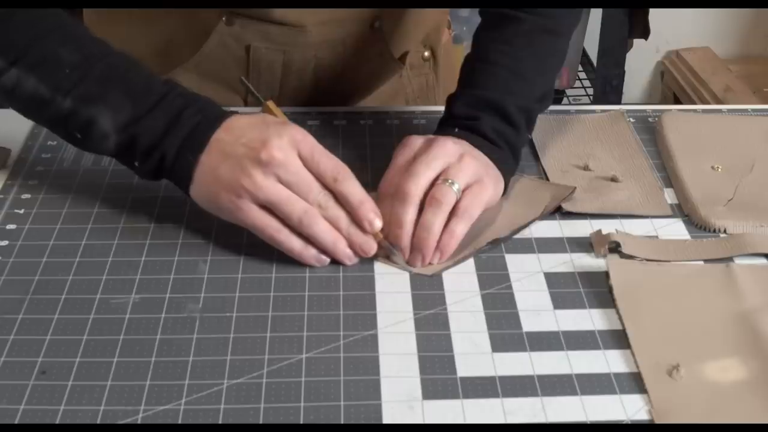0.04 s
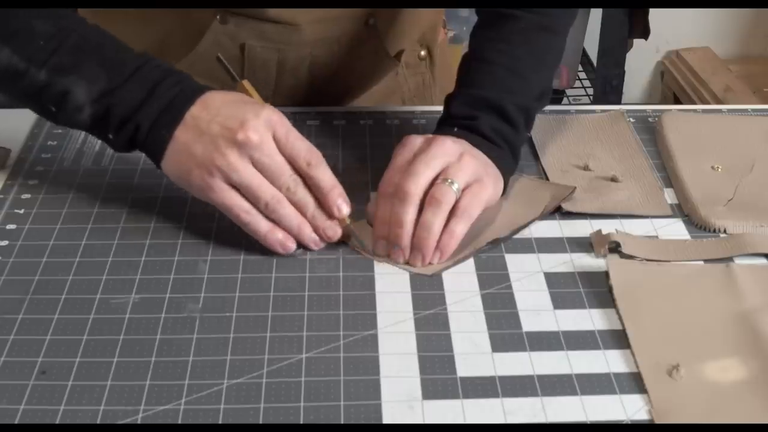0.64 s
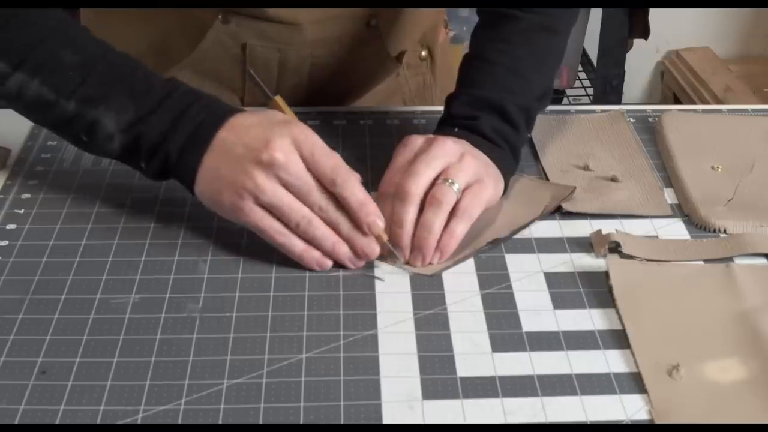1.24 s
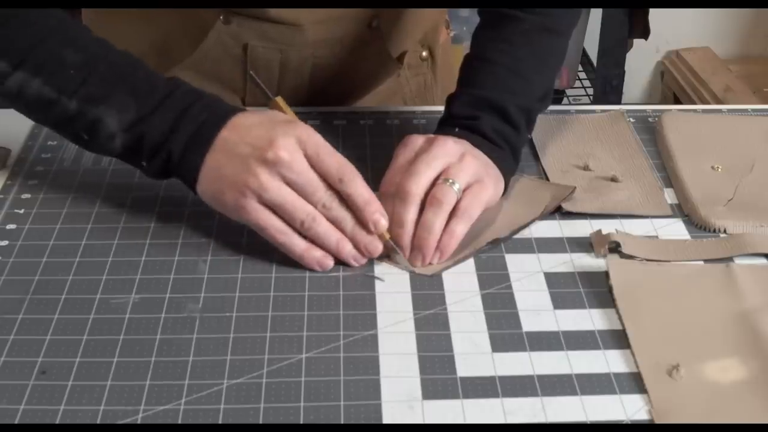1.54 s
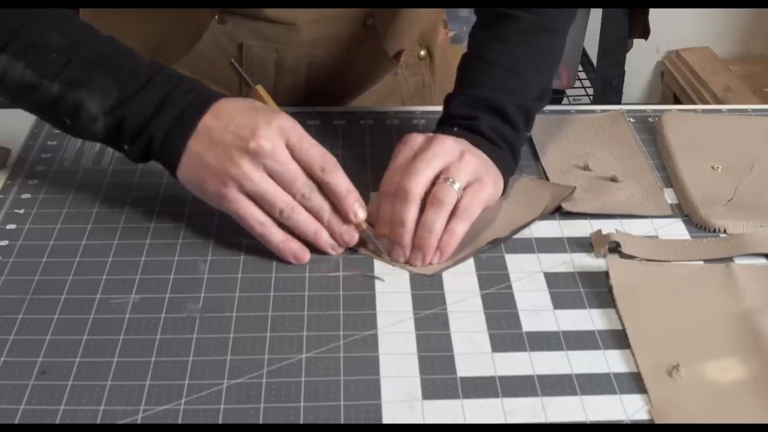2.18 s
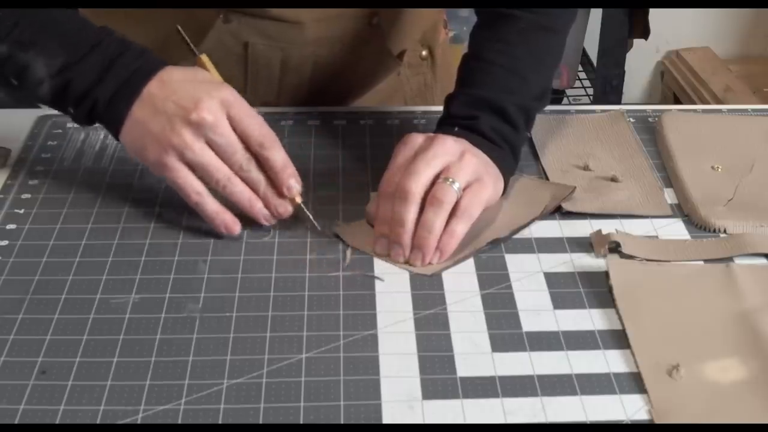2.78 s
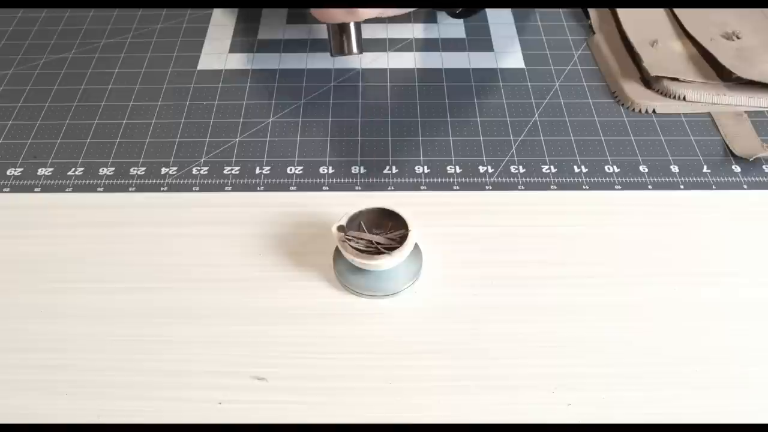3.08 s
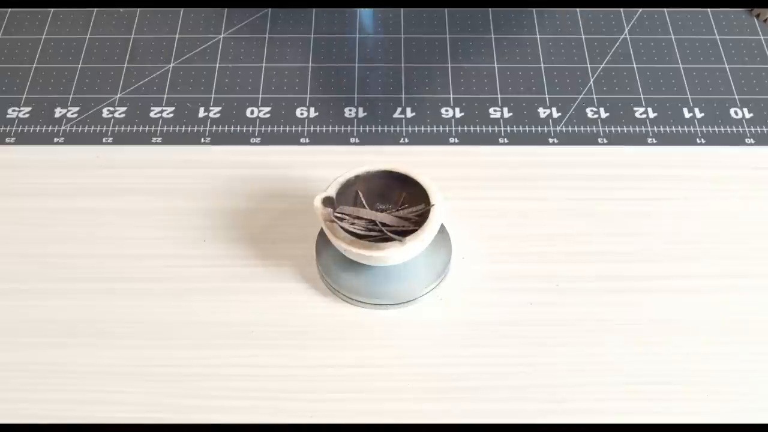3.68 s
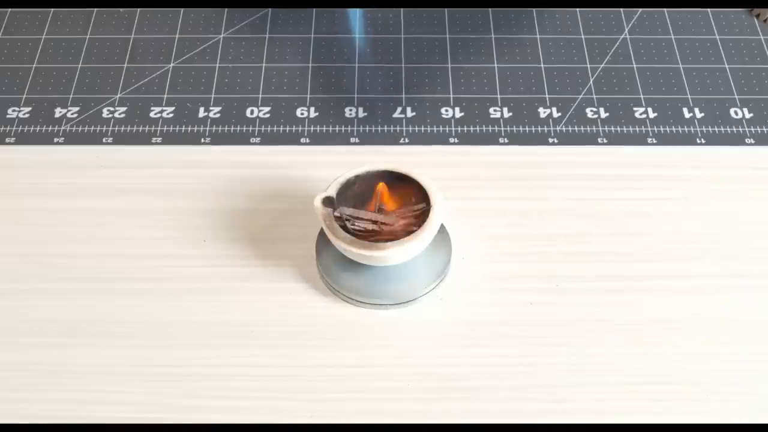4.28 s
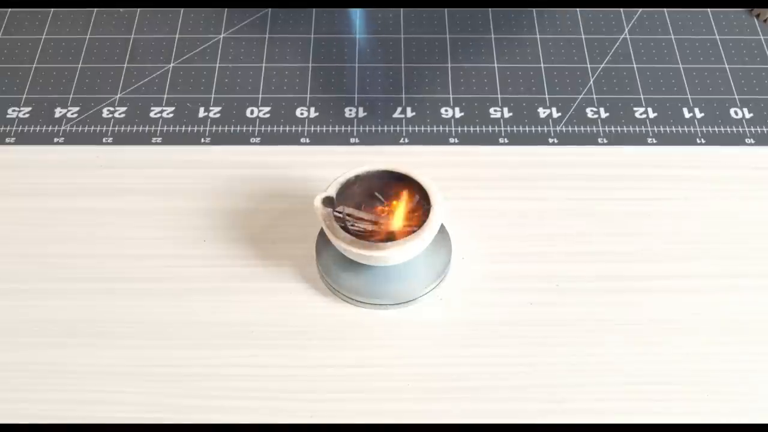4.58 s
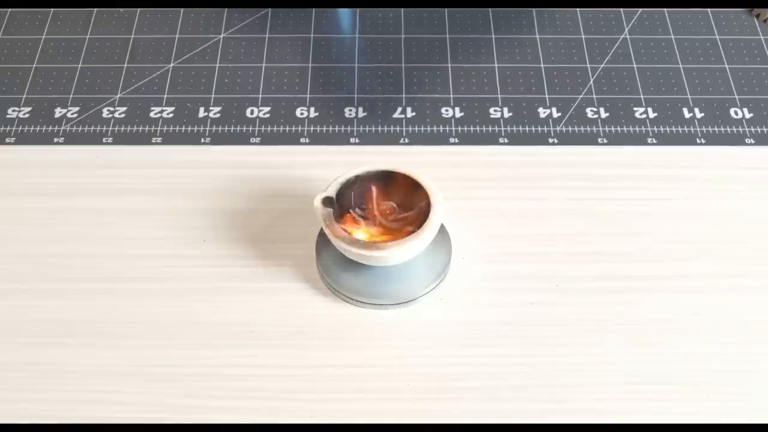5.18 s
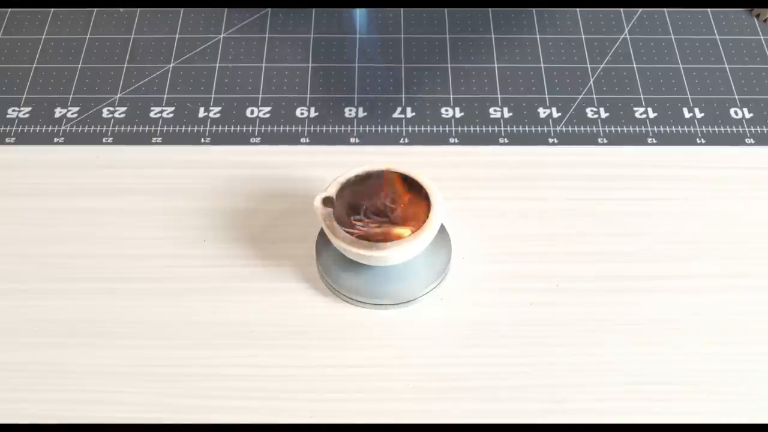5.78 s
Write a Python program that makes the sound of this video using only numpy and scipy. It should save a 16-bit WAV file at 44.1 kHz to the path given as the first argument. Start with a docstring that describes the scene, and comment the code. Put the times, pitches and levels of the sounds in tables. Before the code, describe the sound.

A knife faintly scrapes through leather, then a gas torch snaps twice, lights and burns with a steady hiss and low roar.

```python
"""A workshop bench, one close microphone, a motor humming in the room. First a craft knife scrapes,
squeaks and ticks through leather on a cutting mat. Then the background dips briefly as a gas torch's
valve cracks open and its piezo igniter snaps with only a puff. The valve opens further, gas hisses,
and a second snap lights it. The low flame is turned up and burns on, a low roar under the hiss of
the jet and the singing of the burner tube."""
import sys
import numpy as np
from scipy import signal
from scipy.fft import rfft, irfft, next_fast_len
from scipy.io import wavfile
from scipy.ndimage import map_coordinates

SR = 44100
rng = np.random.default_rng(int(sys.argv[2]) if len(sys.argv) > 2 else 0)


def bounce(signal):
    """Save signal as a 16-bit WAV file at the path given by the first command-line argument."""
    frames = np.transpose(np.atleast_2d(signal))
    limited = np.clip(frames, -1, 1)
    pcm = np.round(limited * 32767).astype(np.int16)
    wavfile.write(sys.argv[1], SR, pcm)


N = 261419

# igniter snaps (time [s], relative level [dB], relative level of the puff of burning gas [dB])
SNAPS = [(2.9243, -15, -39.5), (3.330, -15, -34.5)]
LIT_S = 3.333  # the flame catches


def torch():
    """The flame catches low and is turned up: turbulent burning roars and the jet sings in the tube."""
    # colours of the flame, the jet and its bright fizz on catching (frequency [Hz], level [dB per Hz])
    roar_colour = [(45, -22), (65, -14.5), (100, -6.5), (150, 0), (230, 0), (300, -1.5), (380, -0.5),
                   (500, -2), (660, -9.5), (830, -9), (1120, -20.5), (1400, -25), (1650, -31), (2100, -35),
                   (4000, -63)]
    jet_colour = [(1000, -19), (1900, -18), (2150, -11), (2350, -2), (2850, 0), (3400, 2), (4100, -4),
                  (4600, 4), (5300, -5), (5800, 1.5), (6200, -1.5), (7400, -1.5), (8600, -16.5),
                  (10500, -25.5), (15500, -33)]
    flare_colour = [(1500, -8), (4500, 3), (7500, -6), (10000, -3), (12500, -15), (15500, -18)]
    # resonances of the burner tube (frequency [Hz], width [Hz], level [dB])
    tube_modes = [(1280, 110, 0.5), (1473, 39, -8), (1880, 55, -11.5), (2354, 210, -2.5), (2780, 120, -7),
                  (3320, 230, -13), (3730, 190, -11), (5720, 220, -10), (6820, 270, -8.5), (9980, 400, -26),
                  (11950, 600, -27)]
    # course of the tube's strongest resonance (time [s], level [dB])
    whistle_levels = [(3.6, -62), (3.68, -65), (3.9, -54.5), (4.13, -56.5), (4.63, -53.5), (5.23, -57),
                      (5.67, -57.5), (5.93, -48)]
    roar_db, jet_db, tube_db = -39, -52.5, -56.5  # at full flame
    whistle_hz, whistle_width_hz, flare_t60_s = 4824, 410, 0.42
    low_flame = 1 - ramp(3.674, 0.2)
    flutter = wobble(21.91)
    roar = amp(roar_db - 3 * low_flame + 0.52 * flutter + 0.52 * wobble(70)) * noise(roar_colour)
    jet = amp(jet_db - 10 * low_flame + 0.38 * wobble(3.03)) * noise(jet_colour)
    flare = amp(-53 - 60 * since(LIT_S) / flare_t60_s) * noise(flare_colour)
    tube = amp(tube_db - 6 * low_flame) * resonant_noise(tube_modes)
    whistle_db = np.interp(clock(), *np.transpose(whistle_levels))
    whistle = amp(whistle_db) * resonant_noise([(whistle_hz, whistle_width_hz, 0)])
    singing = glide(tube + whistle, 1 + 0.006 * wobble(3))  # the resonances waver with the heat
    return ramp(LIT_S, 0.0095) * (roar + amp(0.26 * flutter) * (jet + flare + singing))


def igniter():
    """A sprung hammer hits the crystal and rebounds; the torch body rings and the spark lights a puff."""
    # modes of the torch body (frequency [Hz], level [dB], t60 [s])
    body_modes = [(1810, -7, 0.0226), (2030, 0.5, 0.02), (2300, -20, .018), (3280, -4, 0.021),
                  (3620, -9, 0.02), (4120, -0.5, 0.017), (4470, -1.5, 0.015), (5600, 2.5, 0.0099),
                  (6400, -5, 0.013), (6520, 2, 0.013), (7570, -7, 0.011), (7950, -7, .014),
                  (8500, -4.5, 0.0083), (9200, 0, 0.012), (10800, -1, 0.007), (10760, -6.5, 0.013)]
    # colour of the hammer's crack (frequency [Hz], level [dB per Hz])
    crack_colour = [(500, -32), (1200, -23.5), (2000, -9.5), (4000, 4.5), (7000, -7), (11000, 1),
                    (12000, -10), (15500, -12)]
    spring_colour = [(2000, 3.5), (5000, 6), (7500, 1), (10000, 1.5), (12000, -6), (15500, -5.5)]
    puff_colour = [(110, -12), (185, -4), (280, -17), (420, -5), (700, -19), (2000, -31), (8000, -57)]
    t = np.arange(SR // 10) / SR
    ring, crack, puff, rattle = np.zeros((4, N))
    for start, db, puff_db in SNAPS:
        # each mode starts a little after the blow, as the wave crosses the body
        ages = np.maximum(t - rng.uniform(0, 0.000884, (len(body_modes), 1)), 0)
        modes = sum(amp(level + rng.normal(0, 0.8) - 60 * age / t60) * np.sin(2 * np.pi * hz * age)
                    for (hz, level, t60), age in zip(body_modes, ages))
        ring[round(start * SR):][:len(t)] += amp(db - 7) * modes
        blow = burst(start + 0.00018, t60=0.0022, rise=0.00036)
        rebound = burst(start + 0.001004, t60=0.006, rise=0.0001)
        crack += amp(db - 2) * (blow + rebound)
        rattle += amp(db - 30.5) * burst(start + 0.0034, t60=0.13, rise=0.0023)  # the spring shivers on
        puff += amp(puff_db + 3) * burst(start + 0.0099, t60=0.044, rise=0.004)
    bass_cut = signal.butter(4, 1400, "highpass", fs=SR, output="sos")  # the snap carries little below 1.4 kHz
    snap = signal.sosfilt(bass_cut, ring) + crack * noise(crack_colour)
    spring = rattle * noise(spring_colour)
    thump = puff * noise(puff_colour)
    return snap + amp(-28) * reverb(snap) + spring + thump


def pop():
    """Each spark lights a small puff of gas that swells and dies within a few cycles."""
    # the puff's boom in the tube (frequency [Hz], level [dB])
    boom_tones = [(180, 2), (430, -6.5)]
    delay_s, spread_s = 0.0139, 0.0077  # from spark to the height of the puff; its spread
    puffs = np.zeros(N)
    for start, _, puff_db in SNAPS:
        age = clock() - start - delay_s
        boom = sum(amp(db) * np.sin(2 * np.pi * (hz * age + rng.random())) for hz, db in boom_tones)
        puffs += amp(puff_db - 3) * np.exp(-(age / spread_s) ** 2) * boom
    return puffs


def trigger():
    """Small plastic clicks of the trigger and the valve, close up with a little room behind them."""
    # clicks (time [s], relative level [dB], t60 [s], rise [s])
    presses = [(3.004, -34.5, 0.037, 0.014), (3.107, -26, 0.016, 0.0021), (3.5298, -22.5, 0.016, 0.0026)]
    # colour of the plastic (frequency [Hz], level [dB per Hz])
    plastic_colour = [(800, -27), (1600, -6), (2200, 1), (4500, 0.5), (5500, -2), (7100, -1.5), (8000, -8),
                      (10500, -15), (15500, -20)]
    envelope = sum(amp(db - 1.5) * burst(start, t60, rise) for start, db, t60, rise in presses)
    clicks = envelope * noise(plastic_colour)
    return clicks + amp(-19.5) * reverb(clicks)


def gas():
    """Cold gas hisses louder with each step of the valve and fades once it burns."""
    # the valve's two steps (time [s], level of the unlit gas [dB])
    valve_steps = [(2.911, -69.5), (3.176, -59.5)]
    # colour of the cold hiss (frequency [Hz], level [dB per Hz])
    gas_colour = [(300, 10), (800, -9), (1400, -9), (2050, -4), (2260, 9), (2900, -4.5), (3400, 7),
                  (4000, -3), (4350, 1.5), (6450, -1), (7000, -13), (12000, -20), (13000, -25),
                  (15500, -27)]
    step_s, fade_db_per_s = 0.004, 5
    flow = np.max([amp(db) * ramp(start, step_s) for start, db in valve_steps], axis=0)
    return flow * amp(-fade_db_per_s * since(LIT_S)) * noise(gas_colour)


def knife():
    """Fibres part in tiny grains; the blade rings, squeaks and catches, and fingers rub the hide."""
    # colour of the cut (frequency [Hz], level [dB per Hz])
    scrape_colour = [(300, -1), (600, 14), (1200, 3), (2200, 3.5), (4000, 1), (6000, -2.5), (8000, -1.5),
                     (10000, -5.5), (15500, -17)]
    # resonances of the blade, and of the mat and bench under it (frequency [Hz], width [Hz], level [dB])
    blade_modes = [(2200, 160, 0), (2930, 160, -2.5), (3500, 160, -3), (4550, 200, -6), (6850, 270, -2.5),
                   (8720, 260, -2.5), (10240, 400, -6), (11600, 300, -8.5), (12950, 350, -6.5)]
    mat_modes = [(940, 240, 8.5), (1570, 210, -6), (1880, 260, -7), (2670, 390, -3), (3650, 300, 1.5)]
    # the blade sticks and squeaks; fingers shift on the leather (time [s], length [s], level [dB])
    squeaks = [(.73, .17, -80), (1.338, 0.007, -66), (1.359, 0.048, -67.5), (1.412, 0.0051, -55.5),
               (2.583, 0.14, -78)]
    rubs = [(0.285, 0.06, -75), (.372, 0.025, -73), (1.754, 0.073, -73), (1.799, 0.049, -65.5),
            (1.869, 0.033, -70)]
    # the blade catches (time [s], relative level [dB], knock on the mat against the tick [dB], t60 [s])
    catches = [(0.329, -58, -14, .04), (0.644, -45.5, -12, 0.011), (0.846, -45, -14, 0.008),
               (0.8727, -49, -25, .03), (0.994, -48, -14, 0.0074), (1.214, -67, 12, 0.022),
               (1.335, -59, 9.5, 0.076), (1.361, -56.5, 9, .06), (1.391, -64, 6, .06),
               (1.412, -49, 6, 0.023), (2.0868, -46.5, -8, .008), (2.466, -47.5, -10, 0.011),
               (2.666, -43, -12, 0.0099), (2.745, -49, -1, 0.029)]
    edge_colour = [(2000, -5), (3700, -4), (6000, -1.5), (8700, -4), (11000, -15), (15500, -17)]
    t = clock()
    grains = unit(amp(2.8 * wobble(500) + 1.5 * wobble(45)))
    force = hand_pressure()
    # the blade's resonances wander, and ring more under a heavy hand
    blade = glide(resonant_noise(blade_modes), 1 + 0.012 * wobble(3))
    ringing = amp(-5.5) * (force / force.max()) ** 0.41 * blade
    scrape = force * grains * (noise(scrape_colour) + ringing)
    # stick and slip makes the blade's main mode flutter
    sticking = sum(amp(db) * np.clip(np.minimum(t - start, start + length - t) / 0.0015, 0, 1)
                   for start, length, db in squeaks)
    squeak = sticking * resonant_noise([(8620, 360, 0)])
    edge = noise(edge_colour)
    mat = resonant_noise(mat_modes)
    ticks = sum(amp(db - 8.5) * burst(start, t60, rise=0.00045) * (edge + amp(knock_db) * mat)
                for start, db, knock_db, t60 in catches)
    rubbing = sum(amp(db) * np.sin(np.pi * ramp(start, length)) for start, length, db in rubs)
    return scrape + squeak + ticks + rubbing * grains * edge


def hand_pressure():
    """In each stroke the blade bites, the hand presses harder or eases off, then lets go."""
    # knife strokes (start [s], end [s], final level [dB], change over the stroke [dB])
    strokes = [(.29, 0.623, -75, 8), (0.623, 0.806, -69, 1.5), (.82, 1.22, -81, -5.5),
               (1.817, 2.443, -75, 1), (2.428, 2.743, -68, 2)]
    attack_s, release_s = 0.0098, 0.064
    forces = []
    for start, end, db, change_db in strokes:
        press = amp(db + change_db * (ramp(start, end - start) - 1))
        forces.append(press * ramp(start, attack_s) * np.exp(-since(end) / release_s))
    return np.max(forces, axis=0)


def workshop():
    """Room tone: low air noise and the slightly unsteady hum of a motor, over faint microphone hiss."""
    # the motor's tones once settled (frequency [Hz], level [dB])
    motor_tones = [(150.7, -62.5), (188.4, -72), (233, -66)]
    # colour of the room air (frequency [Hz], level [dB per Hz])
    air_colour = [(45, -13.5), (68, 5), (82, -2.5), (115, 0), (150, -6.5), (235, -6), (280, -11),
                  (450, -17.5), (900, -21.5), (1300, -28), (2500, -35), (5000, -41), (10000, -43),
                  (15500, -46.5)]
    air_db, hiss_db = -59.5, -85.5
    growth_db, settle_s = 5.5, 2.5  # the hum creeps up to its level, then holds
    dip_start_s, dip_end_s, fade_s, dip_db = 2.875, 3.181, 0.0048, 17  # the air dips, the hum drops out
    hum = np.zeros(N)
    for hz, db in motor_tones:
        peak = np.sqrt(2) * amp(db + 1.3 * wobble(3.13))
        hum += peak * np.sin(2 * np.pi * hz * clock() + 0.4 * wobble(3.92))
    hum *= amp(growth_db * (ramp(0, settle_s) - 1))
    dip = ramp(dip_start_s, fade_s) - ramp(dip_end_s - fade_s, fade_s)
    hiss = amp(hiss_db) * noise([(1000, -0.27), (15500, -1)])
    air = amp(air_db - dip_db * dip) * noise(air_colour)
    return air + (1 - dip) * hum + hiss


def reverb(x):
    """The room answers 5 ms after the direct sound; each frequency dies at its own speed."""
    # decay of the workshop (frequency [Hz], t60 [s])
    room_decay = [(200, .25), (2000, 0.14), (6000, 0.19), (9500, .12), (14000, 0.16)]
    hz, t, spectra = signal.stft(rng.standard_normal(SR // 2), SR, nperseg=256)
    decay = amp(-60 * t / along(room_decay, hz)[:, None])
    tail = signal.istft(spectra * decay, SR, nperseg=256)[1]
    return signal.fftconvolve(np.pad(x, (SR // 200, 0)), tail / np.linalg.norm(tail))[:N]


def amp(db):
    """Decibels to gain."""
    return 10 ** (np.asarray(db) / 20)


def unit(x):
    """Scale to rms 1."""
    return x / np.sqrt(np.mean(x ** 2) + 1e-20)


def clock():
    """The time of every sample in seconds."""
    return np.arange(N) / SR


def since(start):
    """Seconds since start, 0 before it."""
    return np.maximum(clock() - start, 0)


def ramp(start, length):
    """0 before start, rising to 1 over length seconds."""
    return np.clip((clock() - start) / length, 0, 1)


def burst(start, t60, rise):
    """Envelope that rises at start and dies away; all times in seconds."""
    t = np.arange(SR // 3) / SR
    envelope = np.zeros(N)
    envelope[round(start * SR):][:len(t)] = (1 - np.exp(-t / rise)) * amp(-60 * t / t60)
    return envelope


def wobble(rate):
    """A smooth random curve, rate knots a second."""
    return map_coordinates(rng.standard_normal(int(N * rate / SR) + 4), [clock() * rate])


def glide(x, pitch):
    """x with all its frequencies scaled by a moving ratio."""
    return map_coordinates(x, [np.cumsum(pitch)], mode="mirror")


def along(points, hz):
    """Interpolate (frequency [Hz], value) points on a log axis."""
    knots_hz, values = np.transpose(points)
    return np.interp(np.log(hz + 1), np.log(knots_hz + 1), values)


def filtered(x, response):
    """x through a gain that depends on frequency."""
    size = next_fast_len(N + 8192)
    return irfft(rfft(x, size) * response(np.fft.rfftfreq(size, 1 / SR)), size)[:N]


def noise(colour):
    """Noise of rms 1 with a colour (frequency [Hz], level [dB per Hz]) and no deep bass below it."""
    corner_hz = colour[0][0] / 2
    response = lambda hz: amp(along(colour, hz)) * hz ** 2 / (hz ** 2 + corner_hz ** 2)
    return unit(filtered(rng.standard_normal(N), response))


def resonant_noise(modes):
    """Noise of rms 1 through steep-skirted resonances (frequency [Hz], width [Hz], level [dB])."""
    def response(hz):
        return sum(amp(db) * (hz * width) ** 2 / ((centre ** 2 - hz ** 2) ** 2 + (hz * width) ** 2)
                   for centre, width, db in modes)
    return unit(filtered(rng.standard_normal(N), response))


def scene():
    """All sources at one microphone close to the bench."""
    return (workshop() + knife() + igniter() + pop() + trigger() + gas() + torch())[None]


def record(dry):
    """The microphone rolls off the deepest bass; the recorder keeps nothing above its band limit."""
    low_hz, top_hz = 58, 15850
    microphone = filtered(dry[0], lambda hz: (hz / low_hz) ** 3 / np.sqrt(1 + (hz / low_hz) ** 6))
    return filtered(microphone, lambda hz: 1 / np.sqrt(1 + (hz / top_hz) ** 200))[None]


dry = scene()
out = record(dry)
bounce(out)
```